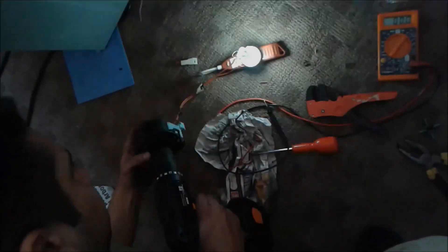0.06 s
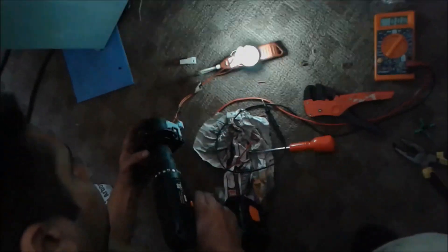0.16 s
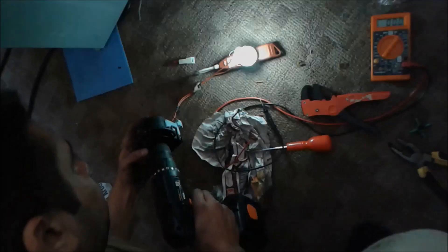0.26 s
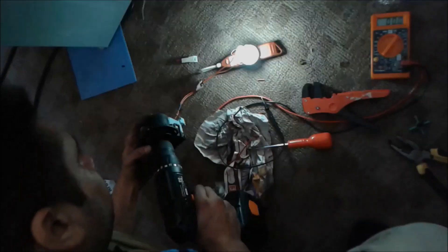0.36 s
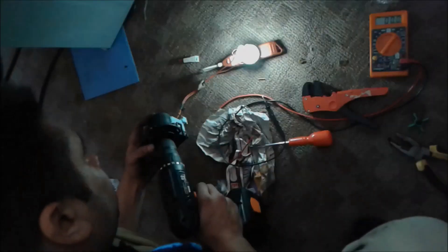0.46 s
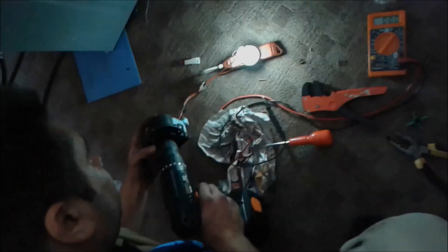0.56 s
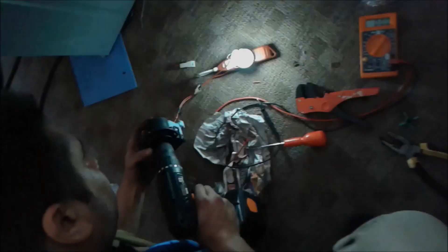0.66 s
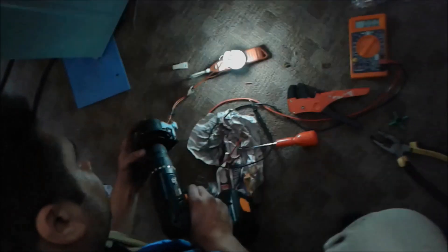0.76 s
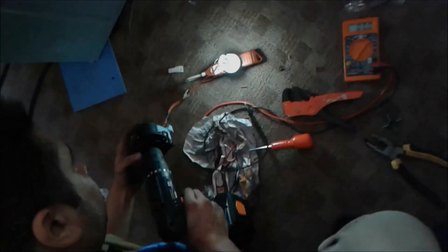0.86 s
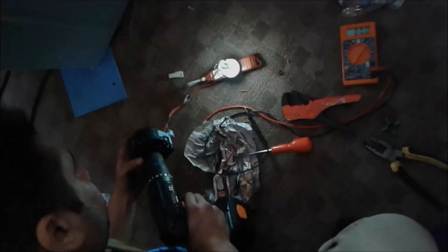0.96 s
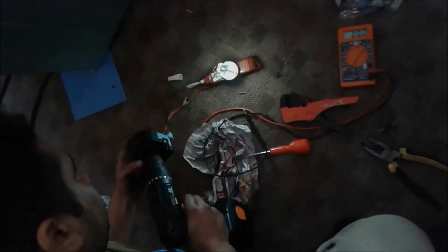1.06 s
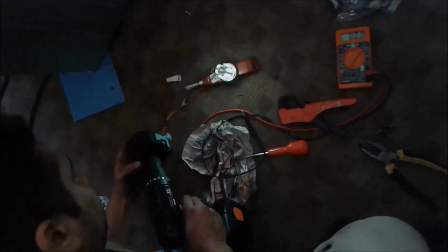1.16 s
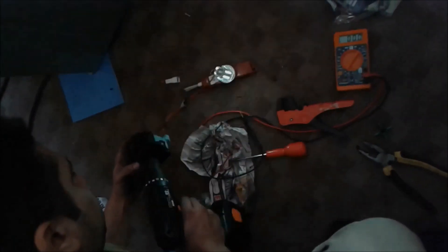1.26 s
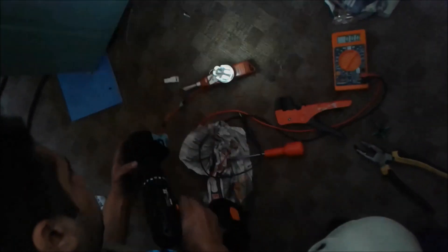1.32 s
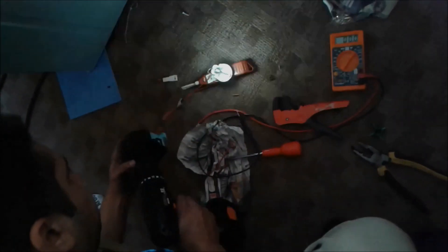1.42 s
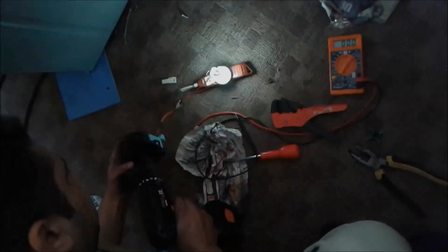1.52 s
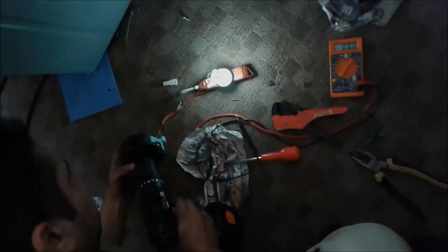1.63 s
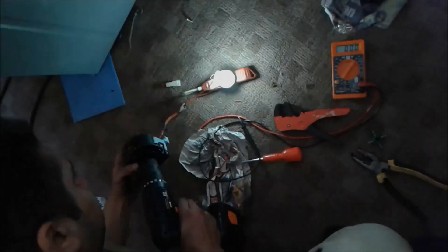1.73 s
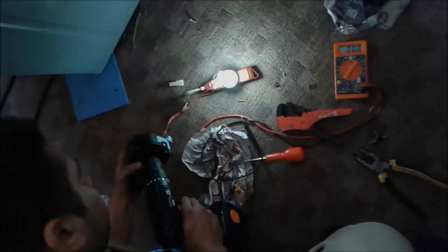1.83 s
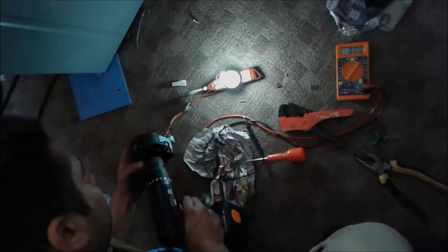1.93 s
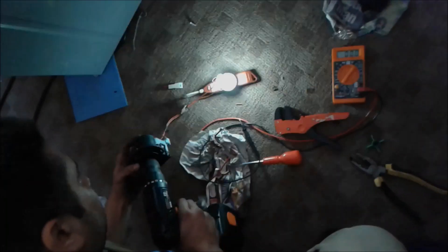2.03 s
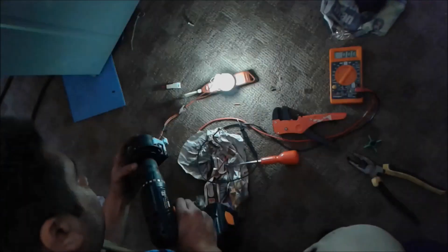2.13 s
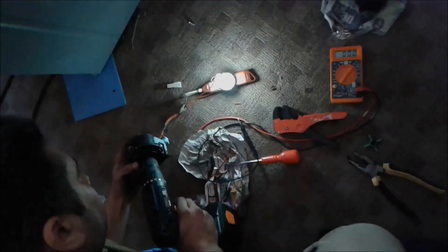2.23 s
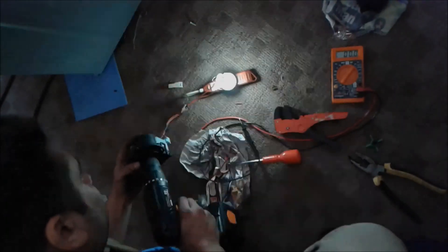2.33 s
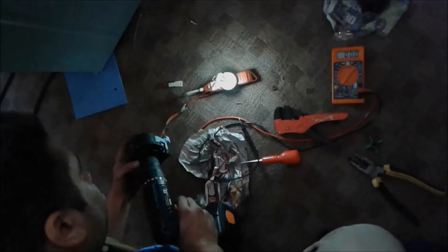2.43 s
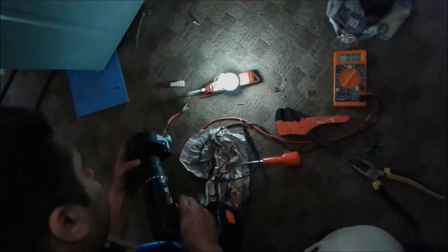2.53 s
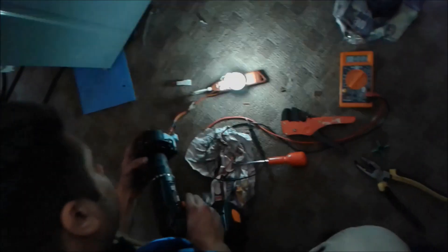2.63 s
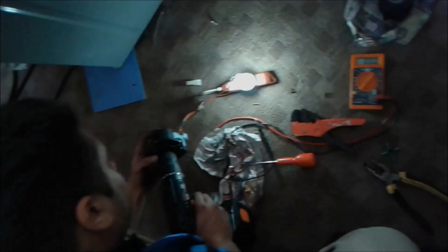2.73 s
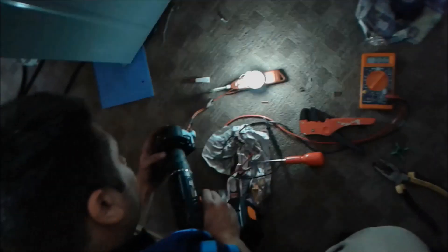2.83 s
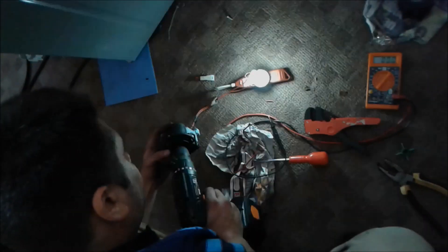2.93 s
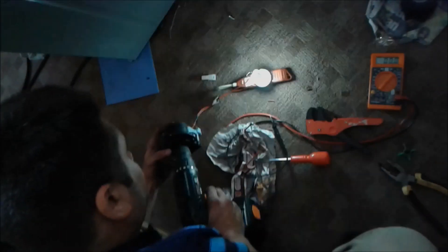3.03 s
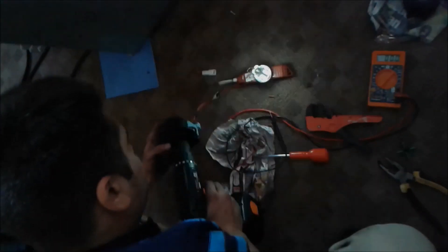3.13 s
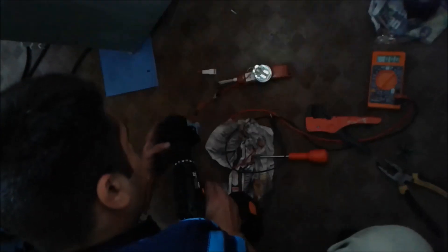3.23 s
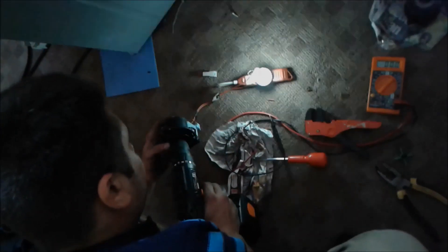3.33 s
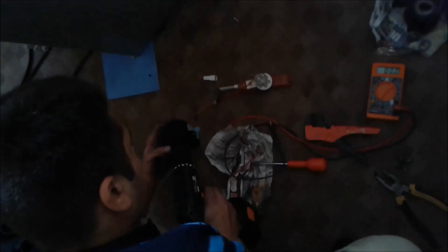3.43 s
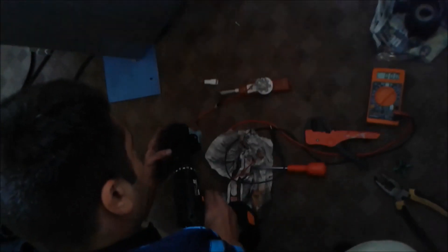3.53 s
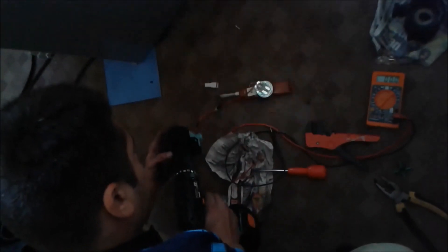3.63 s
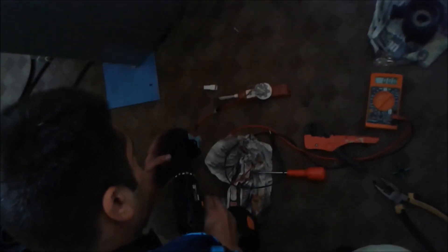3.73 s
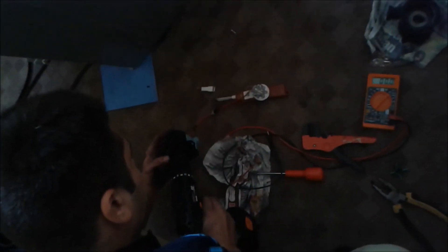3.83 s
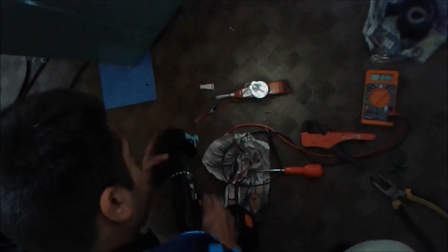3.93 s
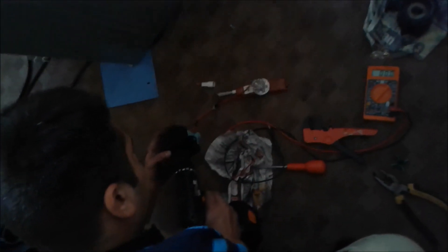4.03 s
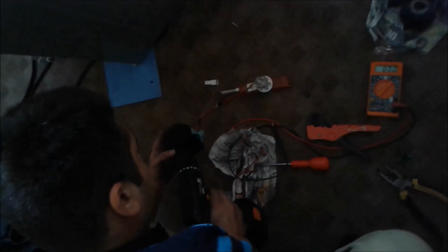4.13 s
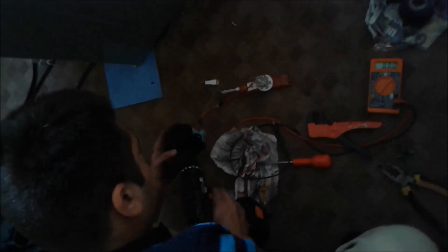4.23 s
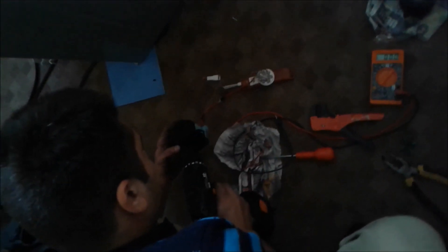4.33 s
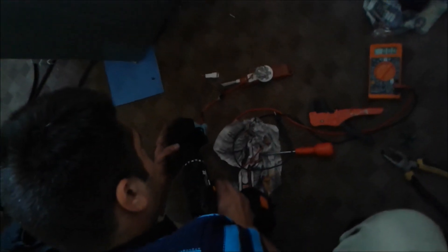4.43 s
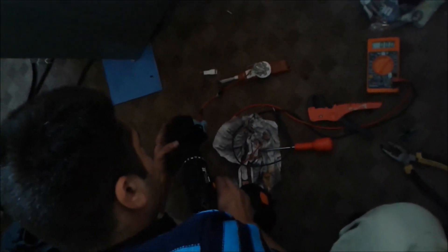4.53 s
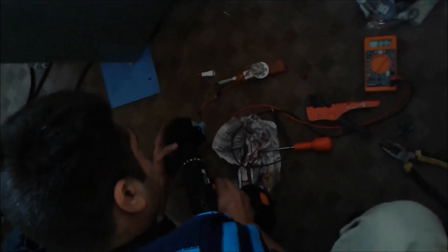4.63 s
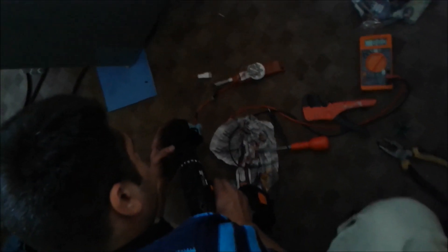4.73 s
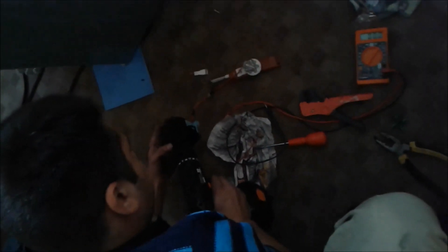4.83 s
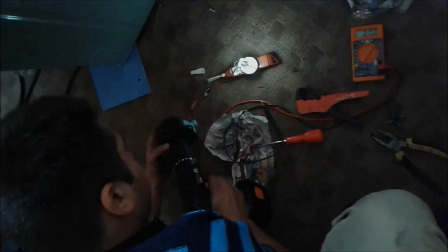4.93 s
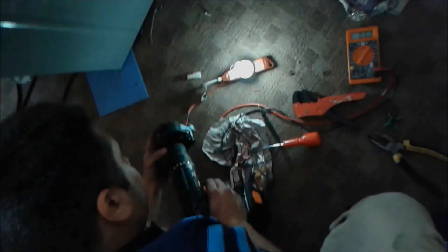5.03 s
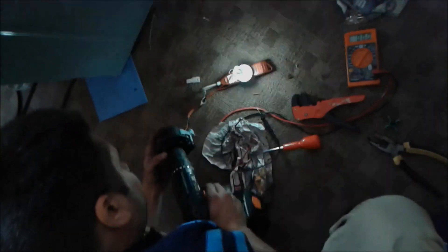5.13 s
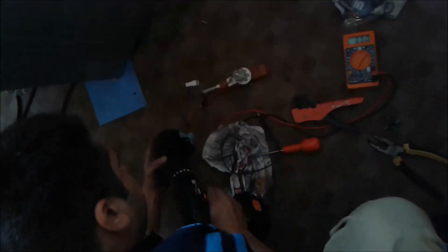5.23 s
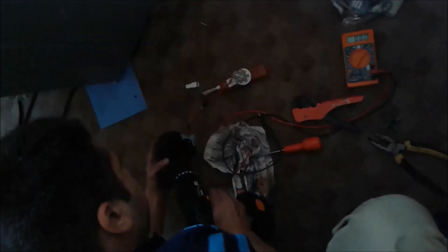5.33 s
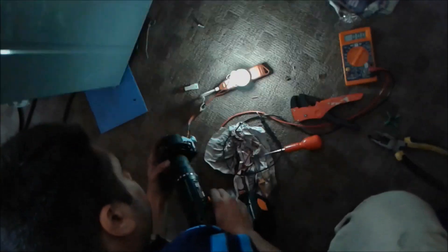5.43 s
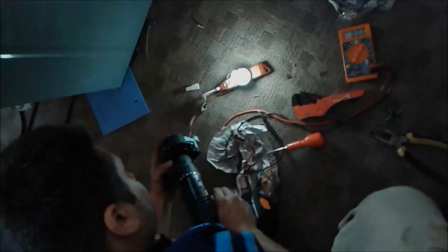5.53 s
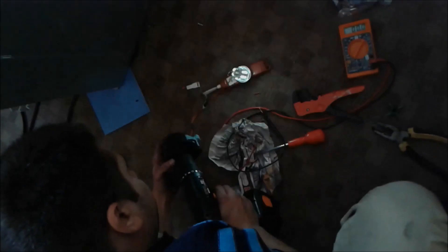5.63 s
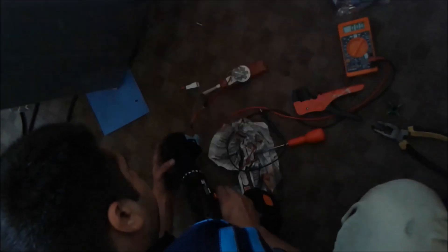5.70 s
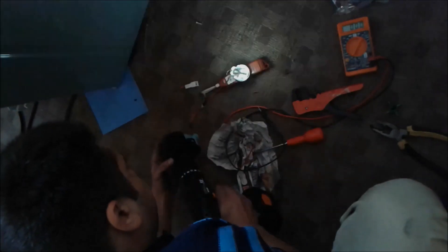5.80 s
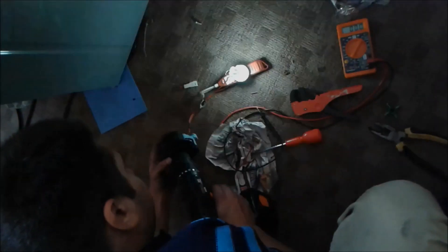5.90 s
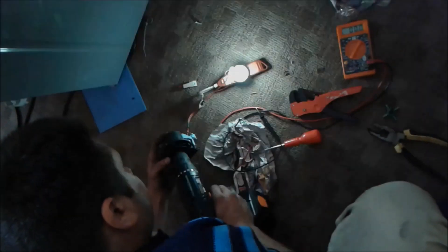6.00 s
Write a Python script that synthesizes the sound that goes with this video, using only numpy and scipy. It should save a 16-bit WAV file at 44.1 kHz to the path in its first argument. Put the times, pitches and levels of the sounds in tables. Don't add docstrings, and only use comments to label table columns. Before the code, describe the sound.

Already at full speed at 0 s, a cordless drill turning a small pump whirs about a metre from the microphone in a small, dry, quiet room. The sound is loud, steady and abrasive: dense plastic gear clatter, bright fan hiss, a thin motor whine and brush whistle, with a slight fast throb. A faint low floor buzz comes at 0.5-1.0 s and briefly near 1.8 s. At 3.1 s the trigger is released; pitch and loudness glide down, growing duller, with small clicks at about 3.6, 3.75 and 4.0 s. A faint touch comes near 4.4 s, then near silence from 4.7 s with barely audible room air and tiny ticks. At 4.95 s a short burst revs up with clicks, then sags; another click at 5.37 s, a shorter burst at 5.5 s. A soft knock at 5.78 s precedes a stronger, rasping spin-up from 5.85 s that is still running at the end, just after 6 s.

```python
import sys
import numpy as np
from scipy import signal
from scipy.fft import rfft, irfft, next_fast_len
from scipy.io import wavfile
from scipy.ndimage import uniform_filter1d

SR = 44100
rng = np.random.default_rng(int(sys.argv[2]) if len(sys.argv) > 2 else 0)


def digitize_waveform(pressure):
    field = np.atleast_2d(pressure).T
    bounded = np.clip(field, -1, 1)
    quanta = np.round(bounded * 32767).astype(np.int16)
    wavfile.write(sys.argv[1], SR, quanta)


def decibels_to_gain(level_db):
    exponent = np.asarray(level_db, float) / 20
    return 10 ** exponent


N = 267246
T = np.arange(N) / SR
SIZE = next_fast_len(N)
BINS = np.fft.rfftfreq(SIZE, 1 / SR) + 1e-3
FULL_HZ = 347.6

# [squeezed t/s, let go t/s, speed the motor heads for f/Hz]
PULLS = [
    (-1, 3.118, FULL_HZ),
    (4.34, 4.40, 120),
    (4.951, 5.133, 340),
    (5.468, 5.564, 340),
    (5.849, 7, 326),
]
PULL_BITE = [0, 0, .15, .85, 1.3]
# [t/s, level/dB of the whole drill]
DRILL_LEVEL = [(0, 1), (1.5, 0.08), (3.2, 0.05), (3.6, 1), (4.05, 0.4), (4.3, 0), (4.42, -2.5), (4.57, -4.5),
               (4.68, -24), (4.976, -47), (4.986, -15.5), (5.06, -6), (5.15, -7), (5.25, -5), (5.35, -4.5),
               (5.45, -2), (5.7, -1.5), (6.06, -2)]
RETURN_TURNS = [1, 4, 12, 36, 72]
RETURN_WEIGHT = [.04, .2, .25, .35, .35]
GEAR_ORDERS = [.5, .75, 1.25, 2, 73 / 36, 89 / 36, 2.5, 3.5, 177 / 36, 6, 23 / 3, 285 / 36, 13, 14, 43 / 3,
               15.5, 29]
GEAR_DB = [-39.5, -47, -33, -32, -33, -23, -24, -29, -25.5, -34.5, -26.5, -25, -21.5, -25, -26, -30, -34]
# [f/Hz, level/dB per Hz]
SHELL = [(15, -67), (30, -40.5), (100, -20.5), (375, -13), (395, -8.5), (640, -10.5), (800, -7),
         (1000, -10), (1800, -8.5), (2850, -7.5), (5300, -7.5), (9000, -7.5), (15000, -19.5),
         (16000, -15.5)]
# [centre f/Hz, width f/Hz, rise level/dB]
RINGS = [(50.2, 10, 10), (544.5, 46, 7.5), (803, 147, 10.5), (1308, 190, 6.5), (1790, 280, 5.5),
         (2580, 440, 4.5), (3925, 200, 6), (4440, 240, 3), (5200, 2000, 2.5), (9100, 900, 1),
         (12700, 650, 4.5), (13800, 700, 8.5), (365, 17, -8), (404, 26, 5.5)]
# [f/Hz, width f/Hz, rise level/dB]
SLOW_BANDS = [(405, 80, -6), (1800, 250, -2), (2330, 250, 2), (2620, 250, -2), (3880, 400, 2.5),
              (5500, 400, 2.5), (13800, 700, -3)]
# [f/Hz, level/dB per Hz]
FAN = [(800, -29.5), (1100, -1), (2000, -6), (3200, 5), (4400, -3.5), (5300, 7.5), (6500, -3.5),
       (9000, -28.5)]
# [multiple of the shaft, speed f/Hz, width f/Hz, level/dB]
HUMS = [(1, 292, 22, -61), (2, 273, 10, -54)]
SLOT_ORDERS = [3, 6]
# [f/Hz, level/dB]
SLOT_WHINE = [(60, -99), (132, -80), (142, -59), (168, -53), (195, -54), (232, -50), (258, -53), (285, -56),
              (310, -62), (335, -66), (347, -59.5)]
BRUSH_ORDERS = [9, 12, 15, 18, 24, 27]
BRUSH_DB = [1, 5, 0, 1, -8, -7]
# [f/Hz, level/dB per Hz]
ROOM = [(15, -22.5), (30, -10.5), (70, -17.5), (150, -8.5), (350, -11), (700, -17.5), (1600, -19.5),
        (5000, -26), (15500, -25)]
# [t/s, length t/s, f/Hz, level/dB]
BUZZES = [
    (0.452, 0.57, 185.4, -57.5),
    (1.742, 0.21, 205, -58),
    (5.105, 0.18, 185, -64),
]
# [t/s, peak level/dB, centre f/Hz,
# width f/Hz, t60 t/s]
CLICKS = [(3.57, -25, 2800, 3500, .05), (3.746, -24, 4900, 3500, .04), (3.973, -31, 4500, 5000, .04),
          (4.387, -49, 4200, 2500, .06), (4.695, -71, 3500, 7000, .1), (4.845, -61, 2800, 8000, .07),
          (4.866, -68, 1500, 2500, .1), (4.981, -46, 4000, 6000, .05), (5.015, -49, 500, 150, .08),
          (5.06, -37, 815, 90, .1), (5.365, -33, 3900, 1000, .09)]
# [t/s, peak level/dB, f/Hz, length t/s]
THUMP = (5.783, -35, 270, .005)


def unit(x):
    return x / np.sqrt(np.mean(x ** 2))


def curve_db(table, hz):
    table_hz, table_db = np.transpose(table)
    return np.interp(np.log(hz), np.log(table_hz), table_db)


def ring_db(hz):
    return sum(db / (1 + (2 * (hz - centre_hz) / width_hz) ** 2) for centre_hz, width_hz, db in RINGS)


def colour(x, db):
    cepstrum = irfft(db * np.log(10) / 20, SIZE)
    cepstrum[1:SIZE // 2] *= 2
    cepstrum[SIZE // 2 + 1:] = 0
    return rfft(x, SIZE) * np.exp(rfft(cepstrum))


def band(spectrum, share):
    return unit(irfft(spectrum * share, SIZE)[:N])


def filtered(sound, gain):
    return irfft(rfft(sound, SIZE) * gain, SIZE)[:N]


def low_pass(hz, order):
    return 1 / (1 + (BINS / hz) ** order)


def walk(rate):
    hold = int(SR / rate)
    steps = np.repeat(rng.standard_normal(N // hold + 1), hold)
    return unit(uniform_filter1d(uniform_filter1d(steps, hold), hold)[:N])


def motor():
    step_s, squeeze_s, let_go_s, spin_up_s = .002, .02, .124, .087
    drag_per_s, friction_hz = .822, 85.6
    surge_hz, surge_from_hz = 70, 250
    t = np.arange(0, T[-1] + step_s, step_s)
    fingers = []
    for on, off, _ in PULLS:
        fingers.append(np.clip(np.minimum((t - on) / squeeze_s, 1 - (t - off) / let_go_s), 0, 1))
    fingers = np.transpose(fingers)
    trigger = fingers.sum(axis=1)
    aim = fingers @ np.array(PULLS)[:, 2]
    hz, now = np.empty(len(t)), FULL_HZ
    for i in range(len(t)):
        drive = (aim[i] - trigger[i] * now) / spin_up_s
        loss = (1 - trigger[i]) * drag_per_s * (now + friction_hz)
        now += step_s * (drive - loss)
        hz[i] = now
    surge = np.clip((aim - trigger * hz) / surge_hz, 0, 1) ** 1.5 / (1 + (surge_from_hz / hz) ** 30)
    surge = surge * (fingers @ PULL_BITE)
    return [np.interp(T, t, v) for v in (hz, trigger, surge)]


def teeth(turns, hz, scatter_db, count):
    step = np.arange(int(FULL_HZ * T[-1] * count))
    blows = rng.standard_normal(len(step))
    for period, weight in zip(RETURN_TURNS, RETURN_WEIGHT):
        length = int(period * count)
        blows += weight * rng.standard_normal(length)[step % length]
    blows *= decibels_to_gain(scatter_db * rng.standard_normal(len(step)))
    blows *= step / count < turns[-1]
    place = np.interp(step / count, turns, np.arange(N - 0.))
    first = np.minimum(place.astype(int), N - 2)
    late = place - first
    out = np.bincount(first, blows * (1 - late), N) + np.bincount(first + 1, blows * late, N)
    return out / np.sqrt(hz)


def tones(turns, hz, orders, dbs, flutter_db, blur_db):
    out, rise_db = 0, ring_db(BINS)
    for order, db in zip(orders, dbs):
        swell_db = np.interp(order * hz, BINS, rise_db) - ring_db(order * FULL_HZ)
        slow_db = blur_db * (order + 6) * (hz / FULL_HZ - 1)
        phase = 2 * np.pi * (order * turns + rng.random())
        level = decibels_to_gain(db + .4 * swell_db + slow_db + flutter_db * walk(18))
        out = out + np.sqrt(2) * level * np.sin(phase)
    return out


def hands(sound):
    edges_hz, swell_db, swell_per_s = [2100, 3000, 4300, 5200], .6, 4
    loose_db, loose_s = 2.5, .5
    below = [0] + [low_pass(hz, 12) for hz in edges_hz] + [1]
    parts = []
    for a, b in zip(below, below[1:]):
        parts.append(filtered(sound, b - a) * decibels_to_gain(swell_db * walk(swell_per_s)))
    return parts[0] * decibels_to_gain(loose_db * np.exp(-(T / loose_s) ** 2)) + sum(parts[1:])


def smooth_power(x):
    return uniform_filter1d(x ** 2, size=4000) + 1e-12


def ripples(sound, count):
    depth_db, width_hz, turns_per_s = 1.8, 60, 6
    top_hz = 7000
    k = int(width_hz / BINS[1])
    shares = np.exp([2 * walk(turns_per_s) for _ in range(count)])
    out = 0
    for share in shares / shares.sum(axis=0):
        noise = rng.standard_normal(len(BINS))
        shape = unit(uniform_filter1d(uniform_filter1d(noise, k), k))
        out = out + share * irfft(colour(sound, depth_db * shape * low_pass(top_hz, 4)), SIZE)[:N]
    return out * np.sqrt(smooth_power(sound) / smooth_power(out))


def clatter(turns, hz, surge):
    octaves = np.log2(hz / FULL_HZ)
    crawl = np.minimum(np.log2(hz / 125.4), 0)
    level_db = -34.5 + 8 * octaves + 13.5 * crawl + 2 * surge
    treble_db = -7 + 4.5 * octaves + .5 * crawl - 2.5 * surge
    bass_db = -15 - 3.5 * octaves - surge
    blows = teeth(turns, hz, scatter_db=1.5, count=96)
    sound = colour(blows, curve_db(SHELL, BINS) + ring_db(BINS))
    deep, low = low_pass(680, 8), low_pass(1100, 8)
    high = 1 / (1 + (6500 / BINS) ** 8)
    chuck = np.cos(2 * np.pi * (turns / 18 + .03))
    pump = np.cos(2 * np.pi * (turns / 36 - .1))
    throb = decibels_to_gain(2.5 * pump + 1.3 * chuck + 1.2 * walk(30))
    rumble = band(sound, deep) * decibels_to_gain(bass_db - 5 * hz / FULL_HZ + .4 * walk(5.7))
    air_share = .45 * np.clip(hz / FULL_HZ, 0, 1) ** 6
    drone_db = bass_db + 6.5 * (octaves - 2 * crawl) + 4 * surge - 6 * air_share + walk(30)
    drone = band(sound, low - deep) * decibels_to_gain(drone_db) * throb
    fan = band(colour(rng.standard_normal(N), curve_db(FAN, BINS)), share=1)
    body = band(sound, 1 - low - high)
    body = body + filtered(body, high_pass_dull()) * (decibels_to_gain(4 * np.minimum(octaves + 1, 0)) - 1)
    middle = hands(body * np.sqrt(1 - air_share) + fan * np.sqrt(air_share))
    treble = band(sound, high) * decibels_to_gain(treble_db + .3 * chuck + .3 * pump)
    mesh = tones(turns, hz, GEAR_ORDERS, GEAR_DB, flutter_db=2.4, blur_db=11) * throb
    shell = rumble + drone + ripples(middle + treble, count=3)
    slow_gain = 0
    for ring_hz, width_hz, db in SLOW_BANDS:
        slow_gain = slow_gain + (decibels_to_gain(db) - 1) / (1 + (2 * (BINS - ring_hz) / width_hz) ** 4)
    shell = shell + filtered(shell, slow_gain) * (1 - (hz / FULL_HZ) ** 5)
    return (shell + mesh) * decibels_to_gain(level_db + .4 * pump + .35 * chuck + .25 * walk(9) + .6 * walk(60))


def high_pass_dull():
    return 1 / (1 + (4500 / BINS) ** 8)


def armature(turns, hz, trigger, surge):
    wobble = trigger * decibels_to_gain(-55 - 5.2 * T) * np.sin(2 * np.pi * turns)
    hum = 0
    for order, peak_hz, width_hz, db in HUMS:
        shake_db = 3 * walk(35) - abs((hz - peak_hz) / width_hz) ** 3
        hum = hum + tones(turns, hz, [order], [db], flutter_db=3.5, blur_db=0) * decibels_to_gain(shake_db)
    once, twice = [tones(turns, hz, [order], [0], flutter_db=1, blur_db=0) for order in SLOT_ORDERS]
    twice = twice * decibels_to_gain(-7 - ((hz - 225) / 14) ** 2)
    slots = (once + twice) * decibels_to_gain(4 * walk(90) + walk(25))
    surge_whine_db = -45.5 + 2 * (ring_db(SLOT_ORDERS[0] * hz) - RINGS[2][2])
    whine = decibels_to_gain(curve_db(SLOT_WHINE, hz)) + surge * decibels_to_gain(surge_whine_db)
    brushes = tones(turns, hz, BRUSH_ORDERS, BRUSH_DB, flutter_db=4, blur_db=20)
    slip = np.clip(8 * (1 - hz / FULL_HZ), 0, 1)
    rasp = slip * walk(600) * np.sin(2 * np.pi * BRUSH_ORDERS[0] * turns)
    sparks = trigger * decibels_to_gain(-56 + 60 * np.log2(hz / FULL_HZ)) + surge * decibels_to_gain(-33)
    return hum + wobble + slots * whine + (brushes + rasp) * sparks


def walls(near):
    t60_s, level_db = .16, -15
    age = T[:SR // 3]
    tail = rng.standard_normal(len(age)) * decibels_to_gain(-60 * age / t60_s) * (age > .003)
    return decibels_to_gain(level_db) * signal.fftconvolve(near, tail / np.sqrt(np.sum(tail ** 2)))[:N]


def room_air():
    air = decibels_to_gain(-71) * band(colour(rng.standard_normal(N), curve_db(ROOM, BINS)), share=1)
    return air + decibels_to_gain(-79.5 + 2 * walk(6)) * np.sin(2 * np.pi * 50 * T)


def buzzes():
    out = 0
    for s, length, buzz_hz, db in BUZZES:
        swell = np.sin(np.pi * np.clip((T - s) / length, 0, 1)) ** 0.63
        phase = 2 * np.pi * (buzz_hz * T + .08 * walk(10))
        out = out + decibels_to_gain(db + 2 * walk(22)) * swell * np.sin(phase)
    return out


def clicks():
    out = np.zeros(N)
    rise_s = .003
    age = T[:SR // 4]
    for s, db, centre_hz, width_hz, t60 in CLICKS:
        crack = rng.standard_normal(len(age)) * decibels_to_gain(-60 * age / t60) * np.minimum(age / rise_s, 1)
        shell = signal.iirpeak(centre_hz, centre_hz / width_hz, SR)
        crack = signal.lfilter(*shell, signal.lfilter(*shell, crack))
        start = int(s * SR)
        out[start:start + len(age)] += decibels_to_gain(db) * crack / abs(crack).max()
    s, db, thump_hz, length = THUMP
    age = np.clip(T - s, 0, length)
    return out + decibels_to_gain(db) * np.sin(np.pi * age / length) * np.sin(2 * np.pi * thump_hz * age)


def gated(air, near):
    depth_db, open_db, range_db = -9.5, -53.5, 10
    loud_db = 10 * np.log10(np.maximum(uniform_filter1d(near ** 2, size=4000), 1e-12))
    gate = decibels_to_gain(depth_db * np.clip((open_db - loud_db) / range_db, 0, 1))
    deep = signal.sosfilt(signal.butter(2, 110, fs=SR, output="sos"), air)
    return (air - deep * (1 - gate)) * gate


def scene():
    hz, trigger, surge = motor()
    hz = hz * (1 + .0006 * walk(14) + .03 * (1 - hz / FULL_HZ) * walk(70))
    turns = np.cumsum(hz) / SR
    drill = clatter(turns, hz, surge) + armature(turns, hz, trigger, surge)
    drill_db = np.interp(T, *np.transpose(DRILL_LEVEL))
    near = drill * decibels_to_gain(drill_db) + buzzes() + clicks()
    return np.tile(near + walls(near) + gated(room_air(), near), (2, 1))


def roll_off(x):
    return signal.sosfilt(signal.butter(12, 15750, fs=SR, output="sos"), x)


def record(dry):
    return roll_off(dry)


dry = scene()
out = record(dry)
digitize_waveform(out)
```